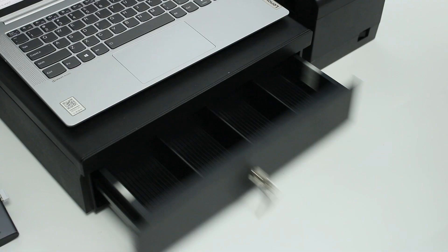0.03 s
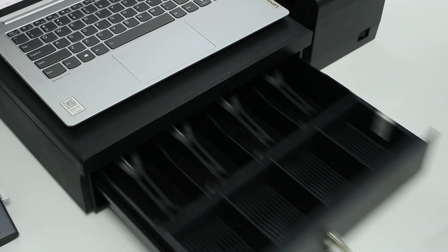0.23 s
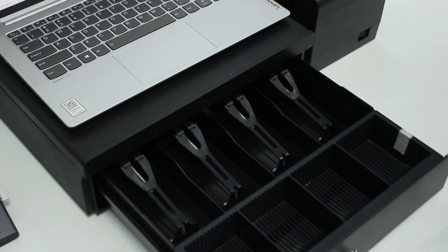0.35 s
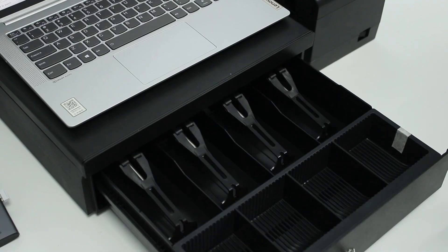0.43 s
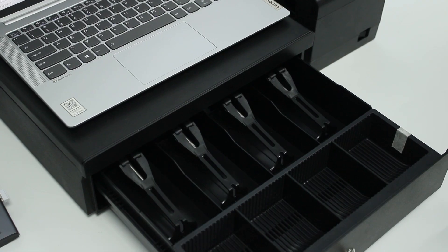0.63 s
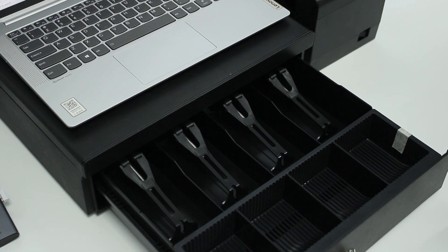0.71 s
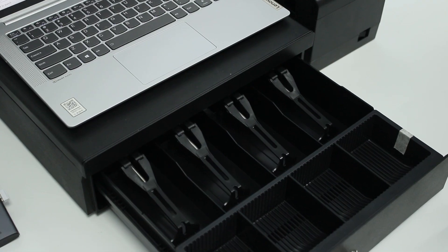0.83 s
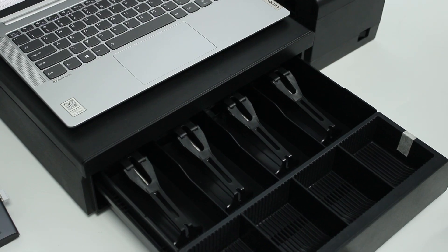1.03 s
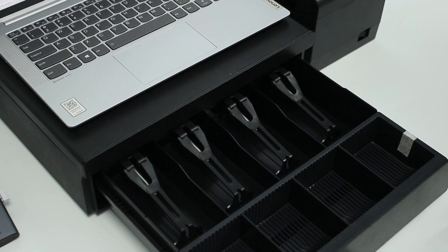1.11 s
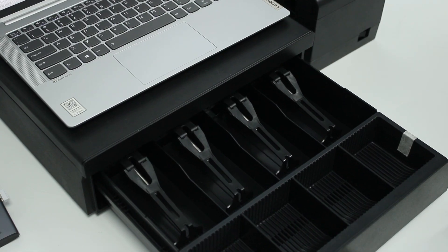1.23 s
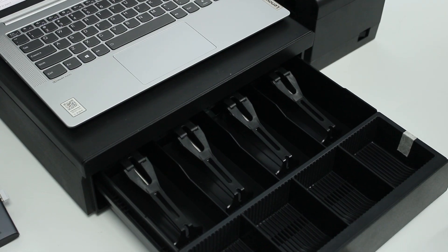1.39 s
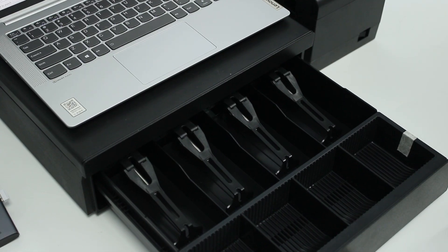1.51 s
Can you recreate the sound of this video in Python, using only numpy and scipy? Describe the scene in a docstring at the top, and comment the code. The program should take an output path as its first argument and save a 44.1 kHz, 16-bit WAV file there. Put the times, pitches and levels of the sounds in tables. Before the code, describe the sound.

A cash drawer shoots open, slams with a metallic clack and rolls slowly back.

```python
"""A steel cash drawer shoots out on its rollers, close to the microphone, its case booming.
It slams against the end stop, chatters and rings; the slam overloads the recorder.
It rebounds and coasts slowly back, the tray droning, the rollers growing duller as it loses speed.
Bill clips and rollers tick on the way. The low noise of a small room lies under it all."""
import sys
import numpy as np
from scipy import signal
from scipy.fft import rfft, irfft
from scipy.io import wavfile

SR = 44100
rng = np.random.default_rng(int(sys.argv[2]) if len(sys.argv) > 2 else 0)


def generate_wav(sig):
    """Save sig (samples, or channels by samples) to the path in sys.argv[1] as 16-bit PCM at SR."""
    pcm = np.round(np.clip(np.atleast_2d(sig).T, -1, 1) * 32767).astype(np.int16)
    wavfile.write(sys.argv[1], SR, pcm)


N = 68355
T = np.arange(N) / SR

# Blows on the end stop: (time [s], level [dB])
BLOWS = [(.3818, 1.5), (.3838, -0.5), (0.3868, -2), (.3918, -16), (.3985, -18.5), (.4145, -19),
         (.4225, -22.5)]
# Drawer modes: (frequency [Hz], relative level [dB], t60 [s])
DRAWER_MODES = [(130.27, -13, 0.15), (325.5, -12.5, 0.16), (395.2, -19, 0.14), (613, -14.5, 0.14),
                (728, -1.5, 0.11), (912, -13, .1), (1133, -15, 0.18), (1449, -6.5, 0.086),
                (1608, -18.5, 0.18), (1900, -5, 0.078), (1966, -17, 0.08), (2171, -0.5, 0.057),
                (2475, -13.5, .1), (2735, -12, 0.073), (2875, -11, .1), (4330, -1.5, 0.042)]
# Clatter of sheet steel and plastic: (frequency [Hz], relative density [dB])
CLATTER_SPECTRUM = [(30, -30), (90, -14), (130, 2), (330, -4), (520, 3), (900, 1.5), (2100, -2), (3300, -1),
                    (7200, -6.5), (9000, -13), (12000, -29.5), (16000, -48)]
# Clatter decay: (frequency [Hz], t60 [s])
CLATTER_DECAY = [(60, .06), (150, 0.083), (1000, 0.089), (4000, 0.07), (9000, 0.083), (14000, 0.035)]

# Rail noise, rolling out: (time [s], level [dB])
OUT_LEVEL = [(.088, -31), (.15, -28.5), (.22, -27), (.3, -24.5), (.375, -24.5)]
# Its spectrum: (frequency [Hz], relative density [dB])
OUT_SPECTRUM = [(40, -24), (95, -21), (150, -4), (215, 2.5), (300, -3), (560, -2), (800, -5), (1600, -1),
                (2800, -7.5), (4900, -15.5), (7800, -18.5), (10500, -37.5), (15000, -66)]
# Its treble loss: (time [s], slope [dB/kHz])
OUT_DULLING = [(.088, -0.54), (.22, -0.5), (.3, .25), (.375, 0.06)]
# Case resonances, drawer inside: (frequency [Hz], width [Hz], strength [dB])
CASE_PEAKS = [(524, 26, 2), (604, 31, 5.5), (726, 18, 7), (920, 33, 4.5), (1170, 35, 3.5), (1600, 28, -6),
              (3090, 90, 1), (4010, 110, 1)]
# Low case modes: (frequency [Hz], level [dB], full at [s], rise [s], fade [dB/s], stop t60 [s])
CASE_MODES = [(127, -33, 0.22, 0.071, 30, 1), (180, -35.5, .16, 0.054, -3, 0.15),
              (383.8, -43, 0.126, 0.046, -7, 0.1)]

# Rail noise, coasting back: (time [s], level [dB])
BACK_LEVEL = [(.44, -35), (.49, -35), (.6, -28.5), (.75, -28), (.92, -31.5), (1.17, -33), (1.27, -37),
              (1.4, -41.5), (1.55, -45.5)]
# Its spectrum at full speed: (frequency [Hz], relative density [dB])
BACK_SPECTRUM = [(40, -30), (95, -20), (135, 1), (300, 2), (490, -5.5), (800, -0.5), (1300, -1),
                 (2600, -2.5), (4000, -10), (7900, -16.5), (10500, -36), (15000, -59)]
# Its treble loss: (time [s], slope [dB/kHz])
BACK_DULLING = [(.45, -0.47), (.62, 0), (.8, .5), (1.0, 1.0), (1.2, 1.26), (1.55, 1.5)]
# Resonances of the extended drawer: (frequency [Hz], width [Hz], strength [dB])
EXTENDED_PEAKS = [(721, 27.5, 5), (870, 48, -2.5), (1010, 41, 2), (1495, 32, -1.5), (2000, 75, -0.5),
                  (2220, 46, -4.5), (2800, 50, -2), (3780, 25, 2), (4400, 80, -6), (5190, 45, -12),
                  (5600, 70, -23)]
# Low tray modes: (frequency [Hz], width [Hz], level [dB])
TRAY_MODES = [(132.23, 9.3, -48), (233.8, 23.6, -42)]
# Tray drone envelope: (time [s], gain [dB])
DRONE_GAIN = [(.45, -6), (.65, -4), (.85, -2), (1.0, 1.5), (1.15, -2.5), (1.23, -8), (1.33, 0.5),
              (1.55, -4.5)]
# Clip and roller ticks: (time [s], level [dB], centre [Hz], width [octaves], t60 [s])
TICKS = [(.5528, -27, 7600, 0.066, 0.01), (.553, -33, 7000, .9, .01), (.5938, -28, 8900, 0.97, 0.031),
         (0.5949, -27, 4250, 1.0, 0.07), (.597, -35, 5130, .03, .1), (.9865, -42.5, 7450, 0.17, .025),
         (1.101, -49.5, 8800, 0.19, 0.018), (1.166, -28.5, 1600, .3, 0.035),
         (1.201, -32.5, 1600, 0.33, 0.027)]

# Room noise: (frequency [Hz], relative density [dB])
ROOM_SPECTRUM = [(20, 5.5), (55, -0.5), (130, 0), (250, 1), (500, -4), (1500, -12), (4000, -24.5),
                 (8000, -32), (14500, -48)]
# Its envelope: (time [s], level [dB])
ROOM_LEVEL = [(.088, -45), (.38, -46), (.48, -73), (.62, -48), (.9, -49.5), (1.05, -41.5), (1.55, -40)]

START_S, STOP_S = 0.0876, BLOWS[0][0]
SINCE_STOP_S = np.maximum(T - STOP_S, 0)
CONTACT_S = 0.0004


def slam(clatter_db=-6, ring_db=-11, blow_s=0.0011):
    """A quick cluster of blows sets off dense clatter and feeds energy to the drawer's modes."""
    t, out = T[:SR // 2], np.zeros(N)
    attack = np.minimum(t / CONTACT_S, 1)
    for at_s, db in BLOWS:
        noise = colour(rng.standard_normal(len(t)), CLATTER_SPECTRUM)
        hz, age_s, bands = signal.stft(noise, SR, nperseg=256)
        decay = amp(-60 * age_s / at_hz(CLATTER_DECAY, hz)[:, None])
        clatter = signal.istft(bands * decay, SR, nperseg=256)[1][:len(t)]
        add(out, at_s, amp(db + clatter_db) * clatter * attack)
    for hz, mode_db, t60_s in DRAWER_MODES:
        energy = np.zeros(N)
        for at_s, db in BLOWS:
            age_s = np.maximum(T - at_s, 0)
            energy += np.minimum(age_s / blow_s, 1) * amp(db - 60 * age_s / t60_s) ** 2
        out += amp(ring_db + mode_db) * np.sqrt(energy) * np.sin(2 * np.pi * (hz * T + rng.random()))
    return out


def roll_out(stop_t60_s=0.098):
    """The spring drives the drawer out; the rail noise dies away after the stop."""
    rollers = dulled(colour(rail(), OUT_SPECTRUM, CASE_PEAKS), OUT_DULLING)
    return rollers * envelope(OUT_LEVEL) * amp(-60 * SINCE_STOP_S / stop_t60_s)


def roll_back(onset_s=0.021):
    """The drawer coasts back; the slower the rollers, the duller their noise."""
    rollers = dulled(colour(rail(), BACK_SPECTRUM, EXTENDED_PEAKS), BACK_DULLING)
    return (rollers * envelope(BACK_LEVEL) + tray_drone()) * np.minimum(SINCE_STOP_S / onset_s, 1)


def rail(grit_per_s=700, grit_share=0.18, spread_db=1.5, flutter_db=0.5):
    """Rollers on a rough rail: fine hiss and specks of grit, under a fluttering load."""
    specks = (rng.random(N) < grit_per_s / SR) * rng.choice([-1, 1], N)
    sizes = amp(spread_db * np.minimum(rng.exponential(1, N), 4))
    grit = np.sqrt(grit_share) * unit(specks * sizes)
    hiss = np.sqrt(1 - grit_share) * rng.standard_normal(N)
    return (hiss + grit) * amp(flutter_db * wander(70))


def case_boom(waver_hz=3.3, waver_db=0.5):
    """Low case modes swell as the drawer gathers speed and ring down after the stop."""
    out = np.zeros(N)
    for hz, db, full_s, rise_s, fade_db_per_s, t60_s in CASE_MODES:
        swell = np.exp(-(np.minimum(T - full_s, 0) / rise_s) ** 2)
        loss_db = fade_db_per_s * np.maximum(T - full_s, 0) + 60 * SINCE_STOP_S / t60_s
        out += tone(hz + waver_hz * wander(34)) * swell * amp(db + waver_db * wander(38) - loss_db)
    return out


def tray_drone(waver_db=2.3):
    """Low tray modes kept ringing by the rollers, wavering in pitch and strength."""
    out = np.zeros(N)
    for hz, width_hz, db in TRAY_MODES:
        gain = amp(db + waver_db * wander(2 * width_hz))
        out += gain * tone(hz + width_hz / 2 * wander(2 * width_hz))
    return out * envelope(DRONE_GAIN)


def ticks(top_hz=11000):
    """Bill clips and rollers ring briefly, each tick in its own band of the clatter spectrum."""
    t, out = T[:SR // 5], np.zeros(N)
    hz = np.fft.rfftfreq(len(t), 1 / SR) + 1
    spectrum = amp(at_hz(CLATTER_SPECTRUM, hz)) / np.sqrt(1 + (hz / top_hz) ** 10)
    attack = np.minimum(t / CONTACT_S, 1)
    for at_s, db, centre_hz, width_oct, t60_s in TICKS:
        band = np.exp(-(np.log2(hz / centre_hz) / width_oct) ** 2 / 2)
        noise = unit(irfft(rfft(rng.standard_normal(len(t))) * band * spectrum, len(t)))
        add(out, at_s, noise * attack * amp(db - 60 * t / t60_s))
    return out


def room():
    """Low rumble and faint hiss; the level dips after the slam."""
    return colour(rng.standard_normal(N), ROOM_SPECTRUM) * envelope(ROOM_LEVEL)


def amp(db):
    """Decibels to gain."""
    return 10 ** (np.asarray(db) / 20)


def unit(x):
    """Scales to rms 1."""
    return x / np.sqrt(np.mean(x ** 2) + 1e-20)


def envelope(points):
    """Gain over time from (time [s], level [dB])."""
    return amp(np.interp(T, *np.transpose(points)))


def at_hz(points, hz):
    """Interpolates (frequency [Hz], value) on a log axis."""
    knots_hz, values = np.transpose(points)
    return np.interp(np.log(hz + 1), np.log(knots_hz + 1), values)


def add(mix, at_s, sound):
    """Mixes a sound in, in place."""
    part = mix[round(at_s * SR):][:len(sound)]
    part += sound[:len(part)]


def tone(hz):
    """Sine on a pitch track, rms 1."""
    return unit(np.sin(2 * np.pi * np.cumsum(hz) / SR))


def wander(rate_hz):
    """Slow random motion, rms 1."""
    hz = np.fft.rfftfreq(N, 1 / SR)
    return unit(irfft(rfft(rng.standard_normal(N)) * np.exp(-(hz / rate_hz) ** 2), N))


def colour(x, spectrum, peaks=()):
    """Filters by a broad spectrum with resonances on it; rms 1."""
    hz = np.fft.rfftfreq(len(x), 1 / SR)
    power = 1 + sum(2 * amp(db) ** 2 / (1 + (2 * (hz - centre_hz) / width_hz) ** 2)
                    for centre_hz, width_hz, db in peaks)
    return unit(irfft(rfft(x) * amp(at_hz(spectrum, hz)) * np.sqrt(power), len(x)))


def dulled(x, slopes):
    """Time-varying treble cut; negative slopes brighten."""
    hz, t, bands = signal.stft(x, SR, nperseg=512)
    loss_db = hz[:, None] / 1000 * np.interp(t, *np.transpose(slopes))
    return signal.istft(bands * amp(-loss_db), SR, nperseg=512)[1][:N]


def scene():
    """The drawer in its room, mono."""
    return (roll_out() + case_boom() + slam() + roll_back() + ticks() + room())[None]


def record(dry, fade_in_s=0.00049, clip_level=0.98, low_cut_hz=40, high_cut_hz=15600):
    """The recorder starts with the drawer already moving, clips on the slam and limits the band."""
    started = dry * np.clip((T - START_S) / fade_in_s, 0, 1)
    clipped = np.clip(started, -clip_level, clip_level)
    thinned = signal.lfilter(*signal.butter(2, low_cut_hz, "high", fs=SR), clipped)
    lowpass = signal.firwin(255, high_cut_hz, window=("kaiser", 8), fs=SR)
    return signal.oaconvolve(thinned, lowpass[None], "same")


dry = scene()
out = record(dry)
generate_wav(out)
```